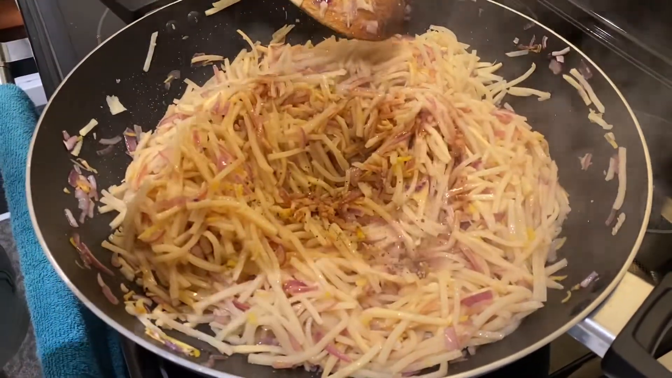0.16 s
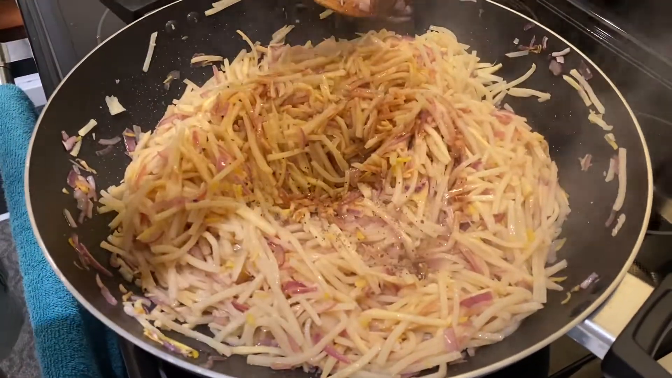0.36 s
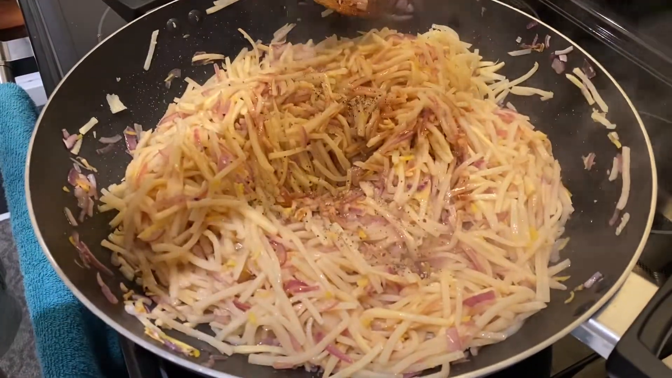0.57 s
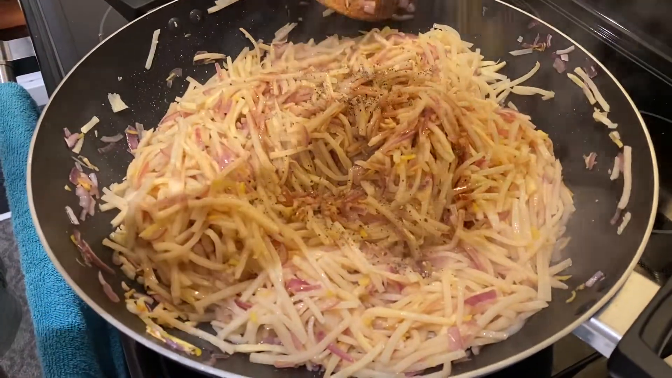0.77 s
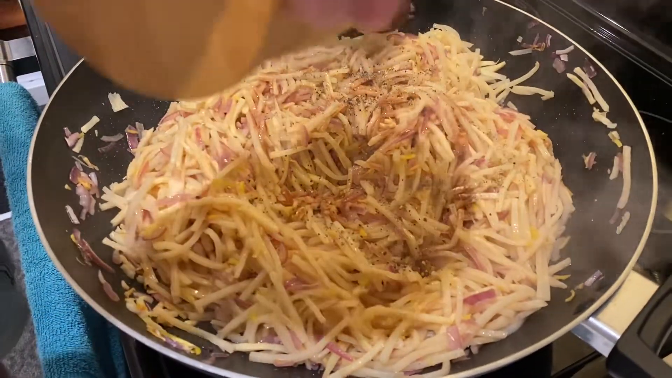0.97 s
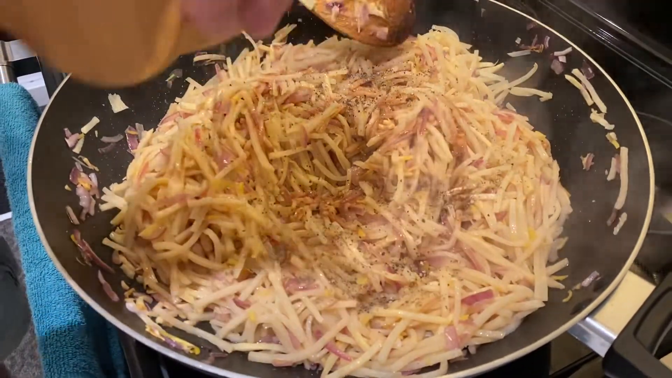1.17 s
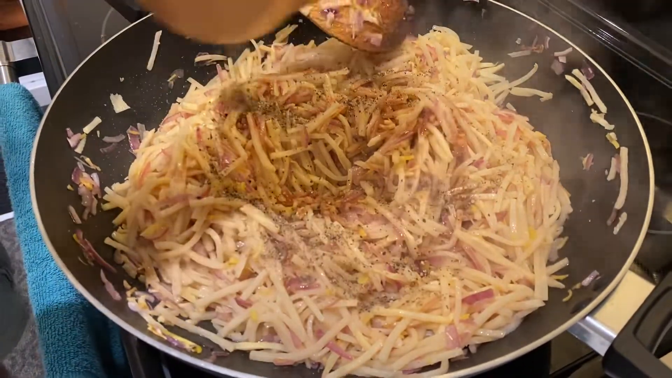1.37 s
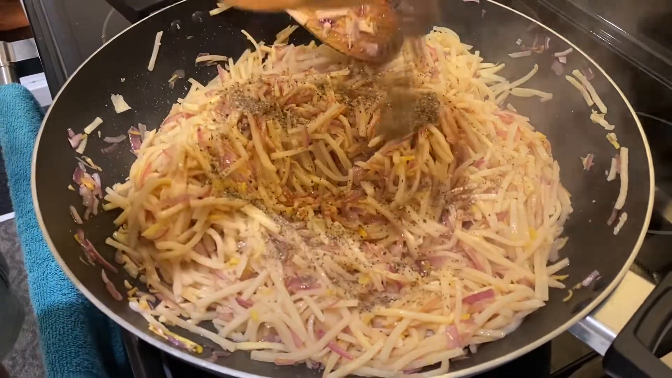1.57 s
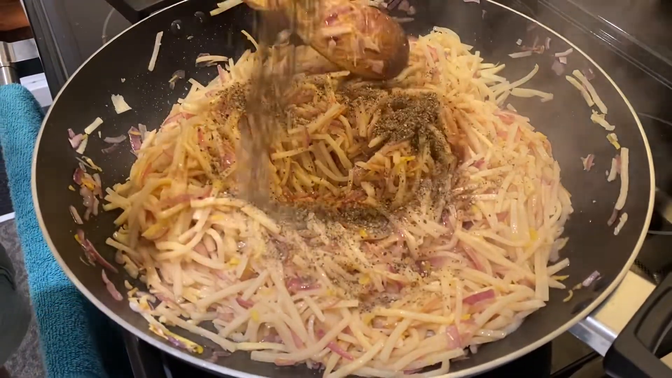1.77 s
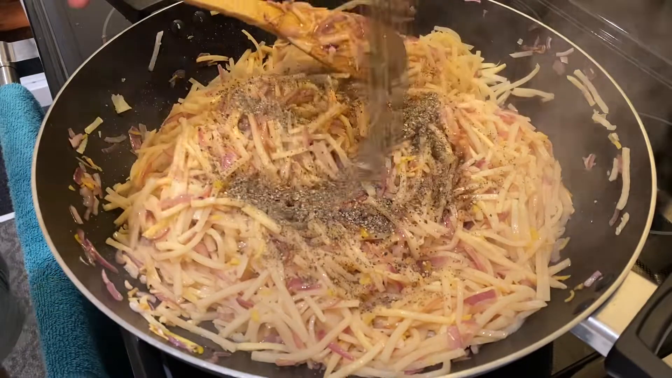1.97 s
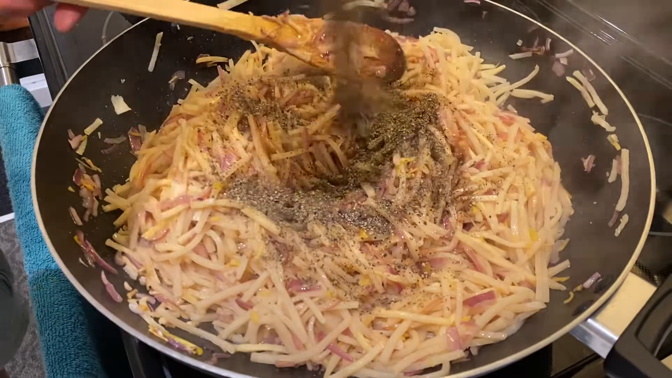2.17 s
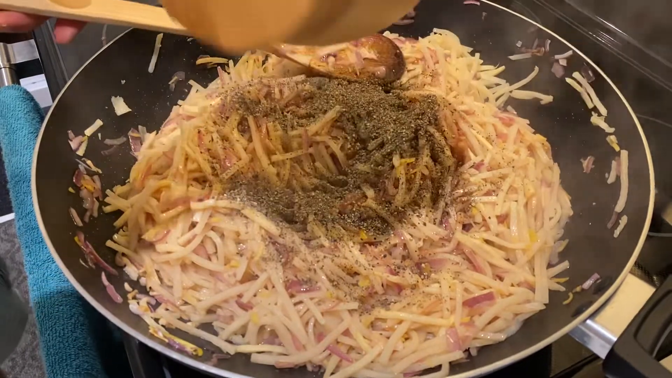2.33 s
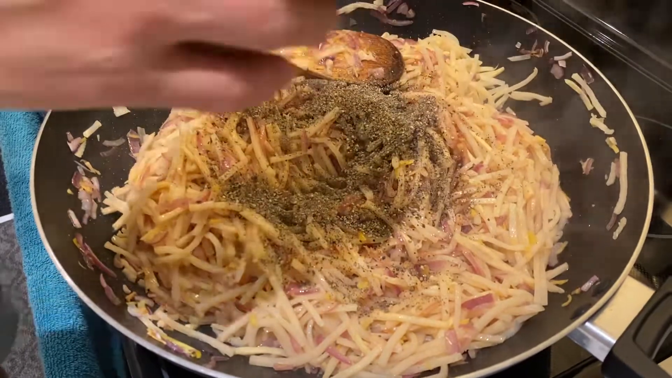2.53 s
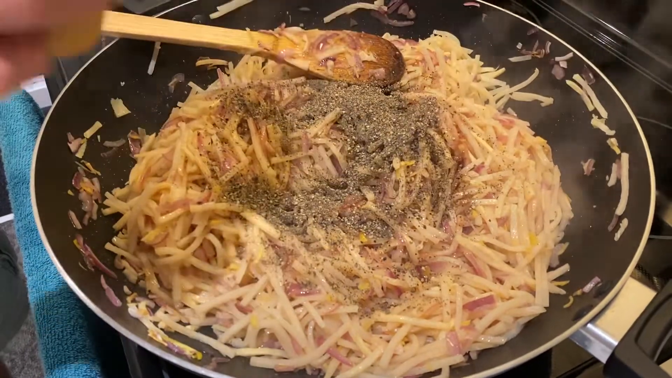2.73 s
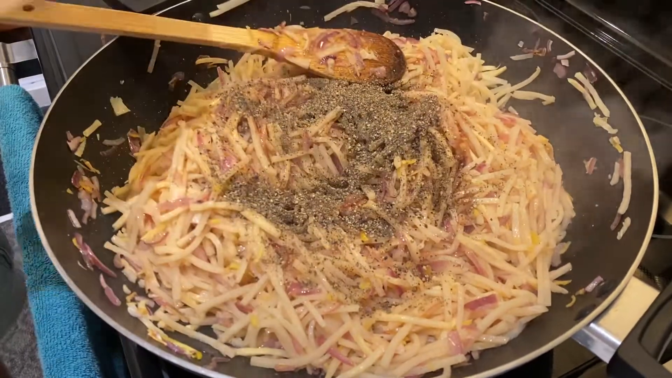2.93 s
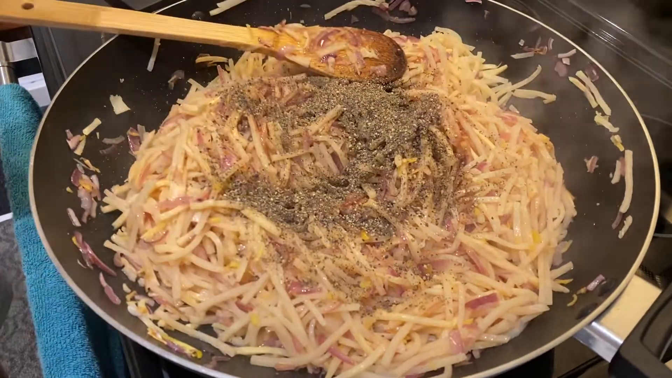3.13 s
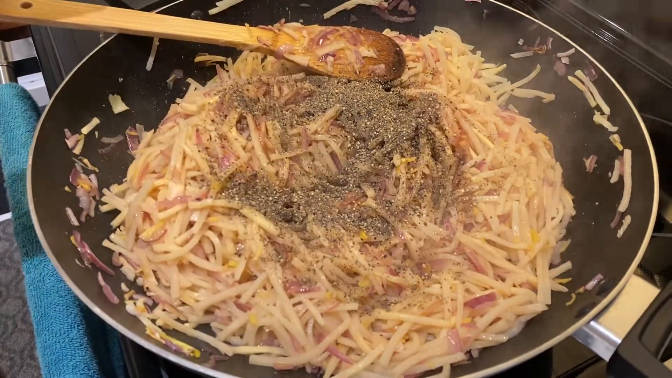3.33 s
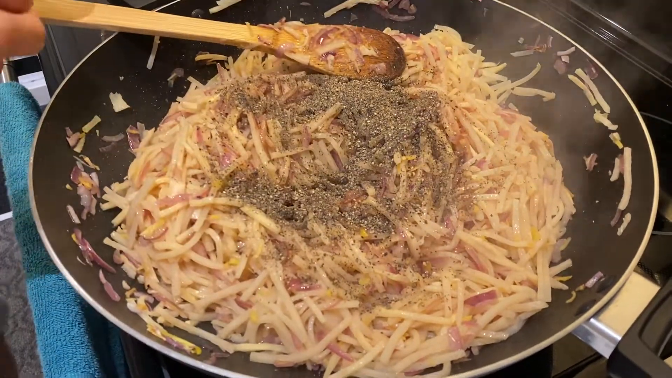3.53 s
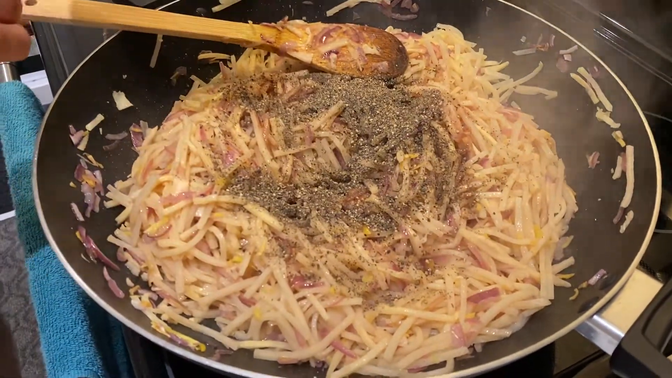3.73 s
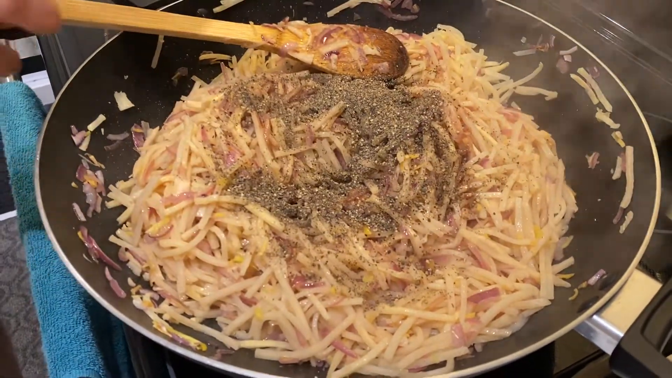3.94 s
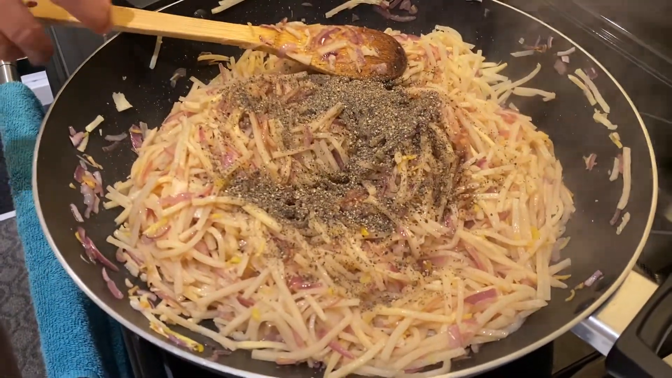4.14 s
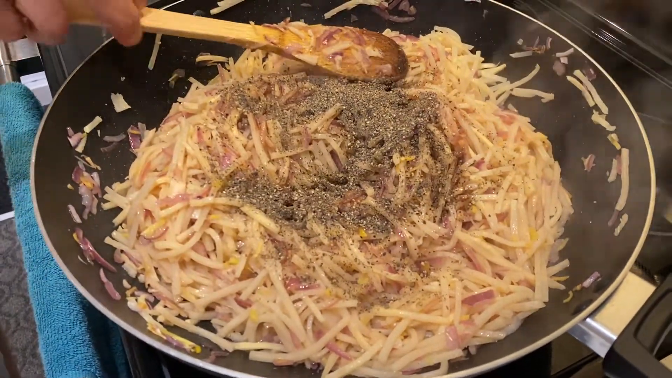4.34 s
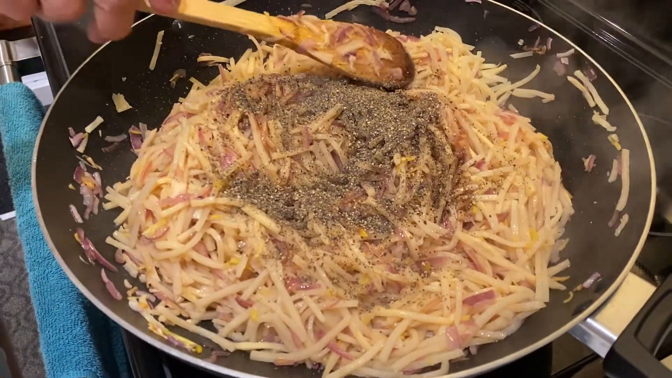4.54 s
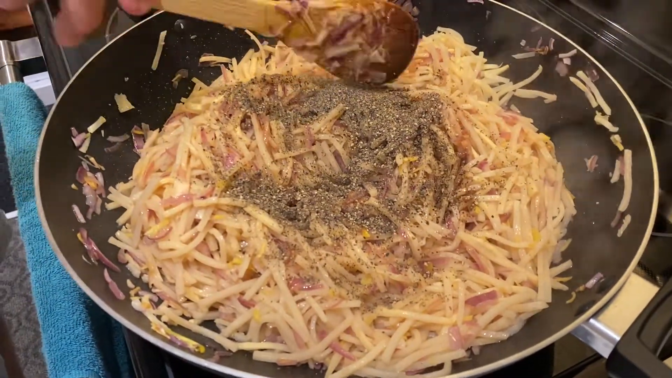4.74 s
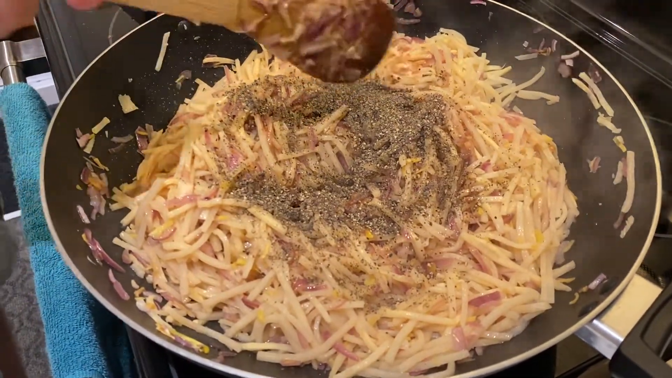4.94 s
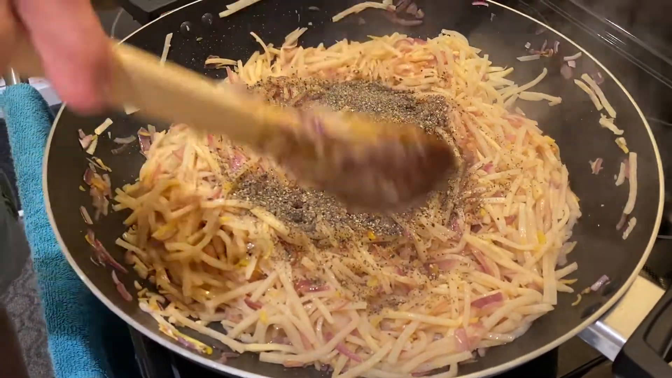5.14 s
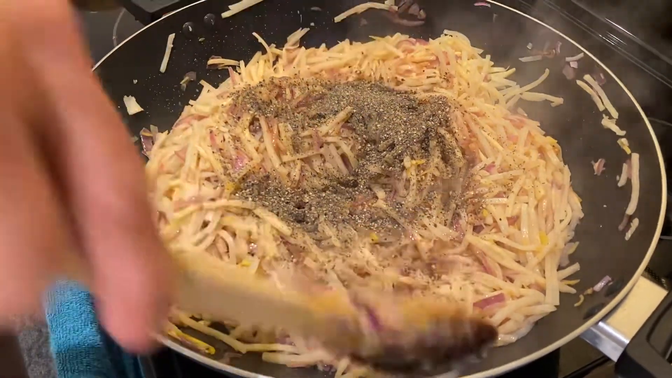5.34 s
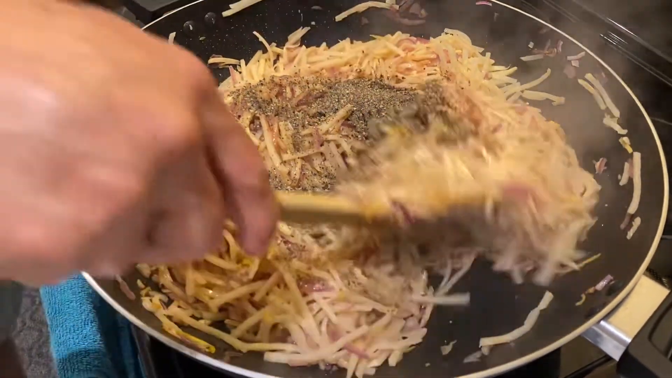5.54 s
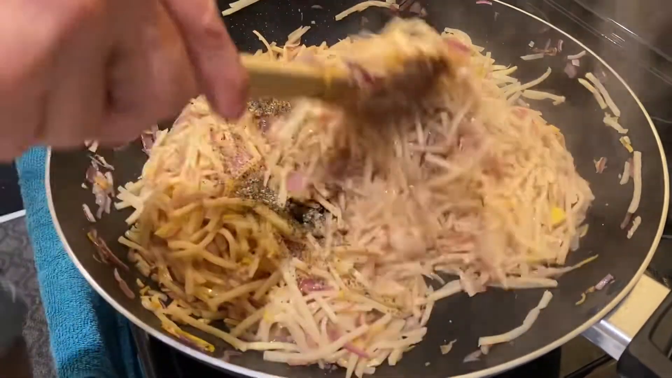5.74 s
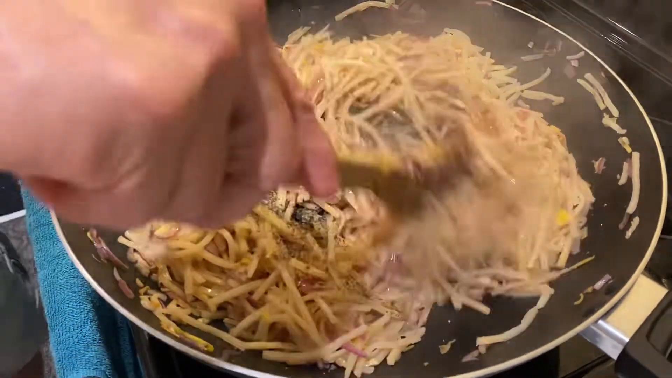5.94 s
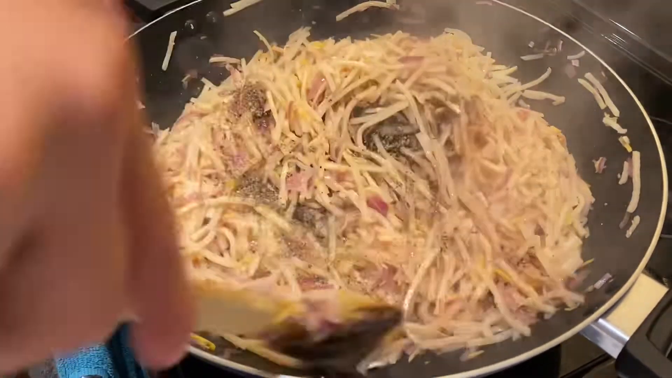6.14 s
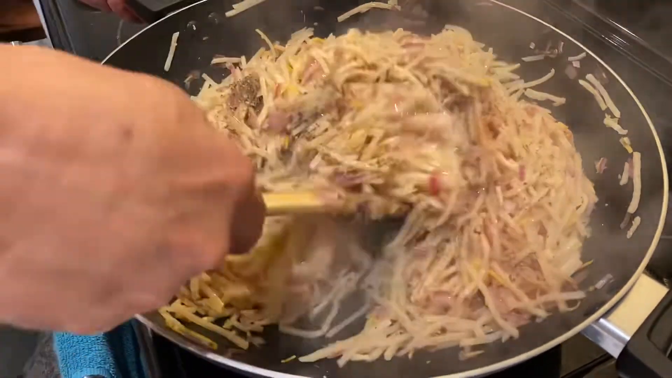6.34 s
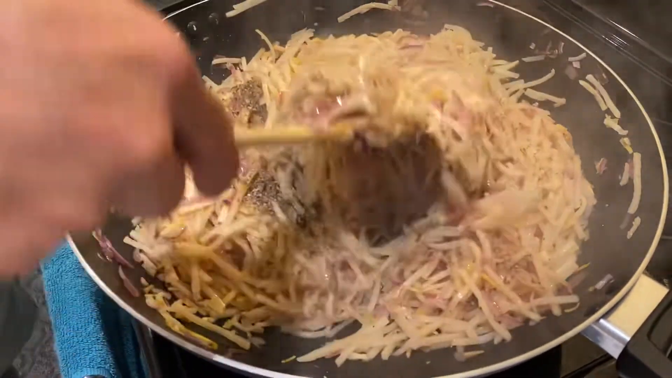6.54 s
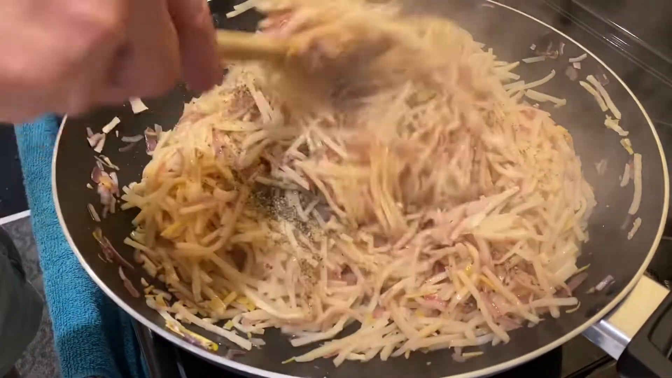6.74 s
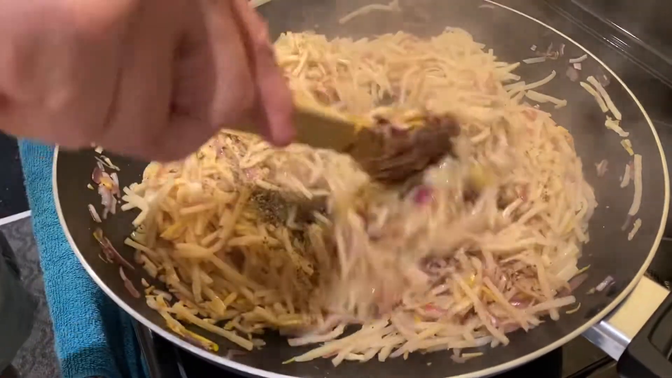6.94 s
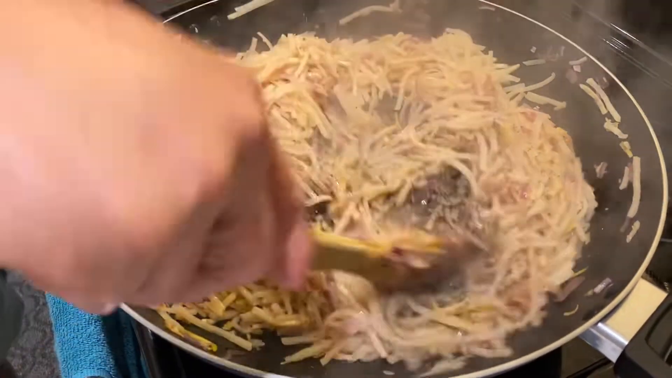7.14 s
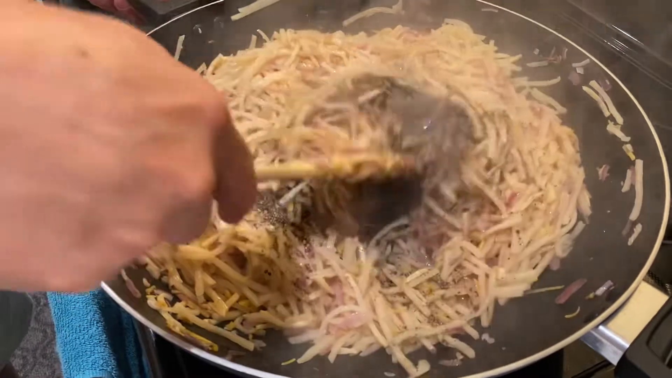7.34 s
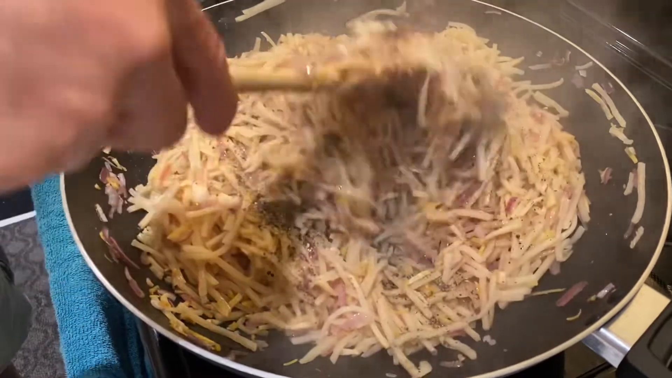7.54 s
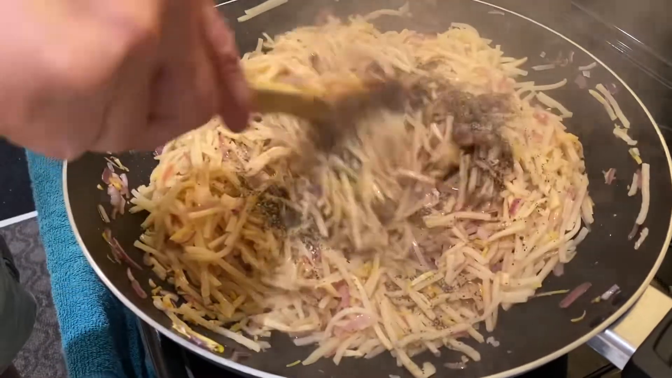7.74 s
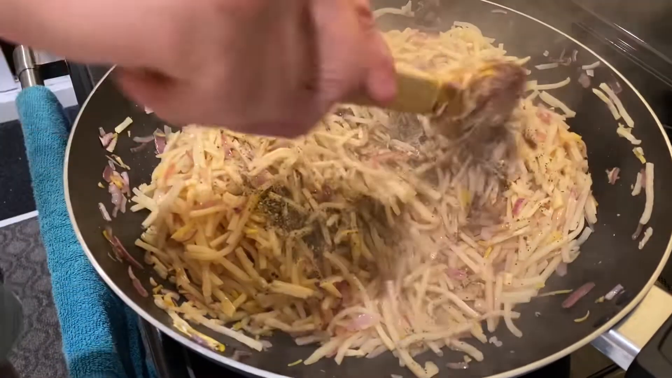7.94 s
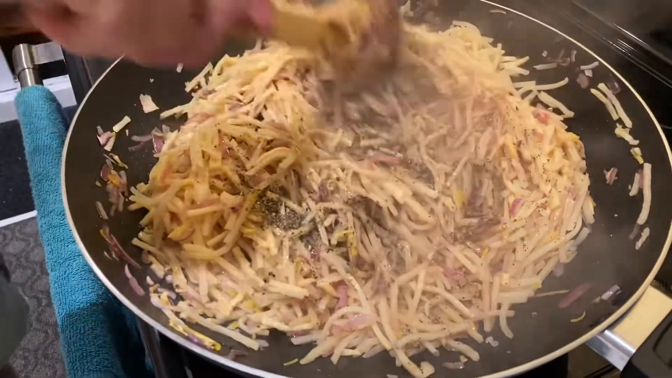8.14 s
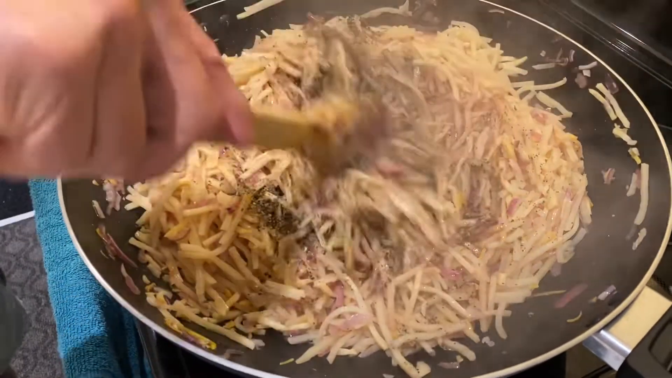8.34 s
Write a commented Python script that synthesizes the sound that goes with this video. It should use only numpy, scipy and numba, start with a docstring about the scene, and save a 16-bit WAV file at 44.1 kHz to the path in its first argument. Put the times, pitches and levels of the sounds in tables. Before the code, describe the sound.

Steady moist sizzling and a low, slightly wavering fan hum, heard close up in stereo in a small room with short reflections. Occasional crisp pops and faint air movement pass over it. A woody double clack on the pan announces the stirring: brief scrapes, soft thuds, denser snaps of oil, and hiss swelling with each turn of wet shreds, fading between strokes.

```python
"""A steady sizzle under a humming hood, with spits and plops, wooden knocks on a pan, then hissing surges of stirring.
Shredded vegetables fry close to a phone in a small kitchen: swarms of damped sines are the bursting steam bubbles,
shaped noise the escaping steam and rushing air, and unsteady sines the hum of the fan. Damped modes struck by short
pushes are the spoon on the pan. With every stroke wet shreds meet hot metal: the sizzle flares up, then fades."""
import sys
import numpy as np
from scipy import signal
from scipy.fft import rfft, irfft
from scipy.io import wavfile
from numba import njit

SR = 44100
rng = np.random.default_rng(int(sys.argv[2]) if len(sys.argv) > 2 else 0)


def digitize_waveform(pressure):
    """Quantize a signal to 16-bit integers and store it at the path in sys.argv[1].

    Rows of a 2-D input are taken as channels; values are limited to [-1, 1].
    """
    field = np.atleast_2d(pressure).T
    bounded = np.clip(field, -1, 1)
    quanta = np.round(bounded * 32767).astype(np.int16)
    wavfile.write(sys.argv[1], SR, quanta)


N = 374850
T = np.arange(N) / SR
FREQS = np.fft.rfftfreq(N, 1 / SR)

# spectrum of spattering oil, relative: frequency_hz, level_db
SPATTER_SPECTRUM = [(100, -60), (2000, -27), (4500, -1), (7000, -0.5), (12000, 4), (16000, 0)]
# strokes of the spoon through the heap, levels relative:
# start_s, rise_s, hold_s, hiss_db, hiss_fade_db_per_s, crackle_db
SPOON_STROKES = [(5.363, 0.074, 0.13, -37, 12, -35.5), (5.823, 0.036, .02, -40, 49, -42),
                 (6.15, 0.057, 0.057, -37.5, 26, -31.5), (6.218, 0.13, 0.32, -34.5, 19, -36),
                 (6.752, 0.046, .04, -41, 45, -34), (7.077, 0.076, 0.11, -37.5, 5.5, -44),
                 (7.194, 0.067, 0.049, -37, 12, -35), (7.698, 0.042, 0.06, -48, 8, -40.5),
                 (8.265, 0.063, .02, -43, 69, -38)]


def undb(db):
    """Logarithmic level: 20 dB is a factor of ten in amplitude."""
    return np.exp(np.asarray(db) * (np.log(10) / 20))


def level(x, db):
    """Root-mean-square scaling: bring the signal to the given rms level in dB."""
    return x * undb(db) / np.sqrt(np.mean(x ** 2))


def colour(x, points):
    """Linear filtering: weight the spectrum by (Hz, dB) points joined along log frequency."""
    hz, db = np.transpose(points)
    gain = undb(np.interp(np.log(FREQS + 1), np.log(hz), db))
    return irfft(rfft(x) * gain, N)


def walk(rate):
    """Low-passed noise: a smooth chance that changes about `rate` times a second, with rms 1."""
    smoothing = 1 + (FREQS / rate) ** 4
    return level(irfft(rfft(rng.standard_normal(N)) / smoothing, N), 0)


def flicker(rate):
    """Piecewise-linear modulation: random levels joined by straight lines, `rate` a second."""
    steps = int(T[-1] * rate) + 2
    return np.interp(T * rate, np.arange(steps), rng.standard_normal(steps))


def swells(table):
    """Amplitude envelopes: a bell for each (centre s, dB, length s), the length being its width at 1/e."""
    total = 0
    for centre_s, db, length_s in table:
        total = total + undb(db) * np.exp(-np.minimum((2 * (T - centre_s) / length_s) ** 2, 20))
    return total


def add(track, s, sound):
    """Superposition: mix a sound into a track at a time in seconds."""
    start = max(int(s * SR), 0)
    part = sound[:max(N - start, 0)]
    track[start:start + len(part)] += part


def kitchen(x, wet_db, left_db):
    """Room reverberation: direct sound, slightly from the left, and the quick echoes of hob, wall and hood."""
    t60_s = 0.33
    t = T[:SR // 3]
    # a strong, brief burst of early echoes on top of the exponential decay
    fade = undb(-60 * t / t60_s) + 7.3 * np.exp(-t / 0.0068)
    echoes = rng.standard_normal((2, len(t))) * fade * (t > 1 / 1000)
    echoes /= np.sqrt(np.sum(echoes ** 2, axis=1, keepdims=True))
    # the right ear hears the direct sound one sample later
    direct = np.array([undb(left_db) * x, np.roll(x, 1)])
    return direct + undb(wet_db) * signal.oaconvolve(x[None], echoes, axes=1)[:, :N]


def hood():
    """Blade tones and flow noise: the fan hums unsteadily over rushing air whose deep bass is alike in both ears."""
    # tones of the fan, levels relative: pitch_hz, level_db, unsteadiness_db
    fan_tones = [(141.3, -39.5, 0.74), (283.2, -46, 3), (118.9, -50.5, 3)]
    # spectrum of the rushing air, relative: frequency_hz, level_db
    air_spectrum = [(20, -36), (35, -18), (55, -5), (90, 0.5), (125, 1), (160, -5.5), (195, 1), (225, -3),
                    (285, 2), (345, -8.5), (390, -14), (460, -8.5), (620, -12), (820, -8), (1500, -27)]
    hum = 0
    for hz, db, shake_db in fan_tones:
        loudness = np.sqrt(2) * undb(db + shake_db * walk(1.7))
        # the phase wanders too, more so for higher tones
        hum = hum + loudness * np.sin(2 * np.pi * hz * T + hz / 300 * walk(1.43))
    air = level(colour(rng.standard_normal(N), air_spectrum), -38.0)
    side = level(colour(rng.standard_normal(N), air_spectrum), -38.0)
    side = colour(side, [(60, -41), (130, -6.0), (280, -13), (500, 1.5), (900, -5.0)])
    return np.array([undb(-1.27) * (hum + air + side), undb(0.16) * (hum + air - side)])


@njit
def bursts(times, hz, cycles, size):
    """Damped oscillation: each bursting bubble is a sine that dies by 60 dB within a few cycles."""
    out = np.zeros(N)
    for k in range(len(times)):
        start = int(times[k] * SR)
        length = cycles[k] * SR / hz[k]
        # a spiralling phasor: its imaginary part is the damped sine
        phasor = size[k] + 0j
        turn = np.exp(2j * np.pi * hz[k] / SR - np.log(1000) / length)
        for i in range(max(start, 0), min(start + int(length) + 1, N)):
            phasor *= turn
            out[i] += phasor.imag
    return out


def fizz(rate, spread_db, cycles):
    """Random superposition: bursts of all pitches; a positive spread makes most tiny and a few large."""
    count = int(rate * N / SR)
    when, pitch, damping, rank = rng.random((count, 4)).T
    hz = 300 * (SR * .45 / 300) ** np.sqrt(pitch)
    size = undb(-spread_db * np.log(np.maximum(rank, 25 / rate)))
    # small, high bubbles are the most common and snap the hardest
    snap = size * hz / (pitch + 1 / 20) ** (1 / 4)
    # `cycles` is the average beyond the first cycle
    return level(bursts(when * N / SR, hz, 1 + cycles * 2 * damping, snap), 0)


def swarm(rate, spread_db, cycles, wet_db, left_db, count=3):
    """Incoherent sources: bubbles burst in several independent groups, each with its own echoes."""
    groups = [kitchen(fizz(rate / count, spread_db, cycles), wet_db, left_db) for _ in range(count)]
    return sum(groups) / np.sqrt(count)


def steam():
    """Turbulent jet noise: smooth hiss, unrelated in the two ears and a little stronger on the left."""
    return rng.standard_normal((2, N)) * undb([[1], [-1]])


def patchy(x, db, rate):
    """Band-wise modulation: patches of the pan flare up, so each third of an octave flickers in level."""
    spectrum = rfft(x)
    # position in thirds of an octave; all below 500 Hz moves together
    place = 3 * np.log2(np.maximum(FREQS, 500) / 500)
    out = 0
    for k in range(16):
        band = np.maximum(1 - np.abs(place - k), 0)
        out = out + irfft(spectrum * band, N) * undb(db * flicker(rate))
    return out


def simmer():
    """Boiling noise: the resting heap's dense bursts and escaping steam, with sparse ticks of spattering oil."""
    # spectrum of the resting sizzle, relative: frequency_hz, level_db
    sizzle_spectrum = [(30, -56), (250, -2.5), (500, -6.5), (900, -3), (1350, 1.2), (2200, -0.95),
                       (3200, -0.5), (4200, -2), (5200, -4), (6200, -7.5), (8000, -9.5), (11000, -14),
                       (14000, -17), (16000, -55)]
    bubbles = swarm(rate=6500, spread_db=0.83, cycles=5.1, wet_db=-2.0, left_db=3.0)
    sizzle = colour(bubbles + undb(-2.5) * steam(), sizzle_spectrum)
    ticks = level(colour(fizz(rate=370, spread_db=7, cycles=1), SPATTER_SPECTRUM), -65)
    return level(patchy(sizzle, db=0.9, rate=25), -35.5) + ticks


def snaps(table):
    """Impulse response of a resonator: a sudden jump of pressure; the narrower its band, the longer it rings."""
    out = np.zeros(N)
    kick = 1. * (T[:SR // 100] == 0)
    for s, db, hz, width_hz in table:
        b, a = signal.iirpeak(hz, hz / min(width_hz, SR / 3), fs=SR)
        snap = signal.lfilter(b, a, signal.lfilter(b, a, kick))
        add(out, s, undb(db) * snap / np.abs(snap).max())
    return out


def pops(table, cycles):
    """Enveloped tone: a soft, lone burst swells for the given number of cycles and dies within a few more."""
    out = np.zeros(N)
    t = T[:SR // 30]
    for s, db, hz in table:
        age = t * hz / cycles
        swell = (age * np.exp(1 - age)) ** 2
        # the tone begins 0.73 ms after the listed time
        add(out, s + 0.00073, undb(db) * swell * np.sin(2 * np.pi * hz * t))
    return out


def small_pops(rate, db, spread_db, hz, octaves):
    """Uniform random events: rows (s, dB, Hz) of weaker pops, stronger once the stirring starts."""
    stirred_gain_db = 9.5
    when, size, pitch = rng.random((int(rate * T[-1]), 3)).T
    s = when * T[-1]
    pop_db = db + spread_db * (2 * size - 1) + stirred_gain_db * (s > SPOON_STROKES[0][0])
    return list(zip(s, pop_db, hz * 2 ** (octaves * (2 * pitch - 1))))


def popping():
    """Transient radiation: fat spits sharply and steam pockets plop, a few loud ones among many weak ones."""
    # loudest spits of fat, levels relative; the width is that of each of two equal resonances:
    # time_s, level_db, pitch_hz, width_hz
    loud_spits = [(0.6965, -24, 3400, 3000), (0.7667, -17.5, 3600, 2800), (1.1955, -25, 3700, 2500),
                  (1.4438, -16, 3600, 1500), (2.0403, -20, 2990, 2500), (2.0697, -24, 2150, 1500),
                  (2.3536, -27, 1900, 1300), (2.985, -11.5, 3670, 5500), (3.0985, -28, 3500, 3000),
                  (4.340, -13.5, 3100, 2800), (4.8475, -16, 2700, 2200), (4.967, -22, 2460, 2500),
                  (5.4284, -7, 11400, 7000), (5.4465, -15.5, 3330, 3000), (5.6345, -11, 3600, 2500),
                  (5.679, -1, 7500, 6000), (5.688, -9, 10500, 6000), (5.8755, -5, 11000, 7000),
                  (6.052, -5.5, 11000, 8000), (6.113, -12, 4600, 3000), (6.4567, -16, 3590, 2500),
                  (6.699, -13, 3400, 2000), (6.757, -17, 3500, 2500), (6.8115, -7, 9000, 10000),
                  (6.8282, -6.5, 4200, 3600), (6.852, -13, 4800, 3000), (7.003, -18, 3240, 3000),
                  (7.047, -13, 2960, 3000), (7.382, -20, 4000, 3500), (7.395, -10, 3380, 2500),
                  (7.846, -14, 3500, 2500), (7.912, -10, 5180, 3500), (7.9965, -11, 3800, 2400),
                  (8.0845, -8, 5200, 6000), (8.349, -6, 11000, 7000)]
    # loudest steam pockets plopping under the heap, levels relative: time_s, level_db, pitch_hz
    loud_plops = [(0.221, -31, 840), (1.624, -24, 1140), (2.205, -32, 918), (5.087, -27, 880),
                  (7.395, -32, 611)]
    weak_spits = small_pops(rate=7, db=-30.0, spread_db=4, hz=3100, octaves=0.44)
    # a weak spit is 2200 Hz wide, so it barely rings
    spits = list(loud_spits) + [(*row, 2200) for row in weak_spits]
    plops = list(loud_plops) + small_pops(rate=1.1, db=-37.5, spread_db=5, hz=1510, octaves=0.41)
    return snaps(spits) + pops(plops, cycles=1.4)


def draughts():
    """Low-frequency wind noise: air brushes the microphone as the hands move over the pan."""
    # soft swells of moving air: centre_s, level_db, length_s
    air_swells = [(1.0, -39.5, 0.3), (1.42, -40, 0.13), (2.34, -38, 0.11), (2.5, -40, 0.13),
                  (7.18, -41, 0.2)]
    rumble = colour(rng.standard_normal(N), [(20, -37), (50, -9), (85, -4), (140, -8), (500, -68)])
    return swells(air_swells) * level(rumble, 0)


def ring(modes):
    """Modal synthesis: damped sines with joint peak 1; neighbouring modes start in opposite directions."""
    t = T[:SR // 3]
    y = 0
    for k, (hz, db, t60_s) in enumerate(modes):
        decay = np.exp(-np.log(1000) * t / t60_s)
        y = y + (-1) ** k * undb(db) * np.sin(2 * np.pi * hz * t) * decay
    return y / np.abs(y).max()


def spoon():
    """Impact excitation: wood strikes the pan and rebounds, duller for longer contact; the pan rocks on the hob."""
    # bare spoon knocking and bouncing on the pan, levels relative, the clack decaying to 1/e:
    # time_s, level_db, contact_ms, pan_ring_db, clack_decay_s
    knock_events = [(4.8662, 0.9, 0.41, -1.1, 0.014), (4.8833, -5.3, 0.5, 0.5, 0.017),
                    (4.8892, -7, 0.4, 1.5, 0.027), (4.908, -15.5, 0.28, 0, 0.046),
                    (4.929, -20, 0.31, -1, 0.04)]
    # the pan rocking on its grate, levels relative: time_s, level_db
    rock_events = [(4.8753, -16.5), (4.903, -16.5)]
    # ring of spoon and pan, levels relative: frequency_hz, level_db, t60_s
    pan_modes = [(497, -21, 0.16), (840, -0.5, 0.021), (983, 1.5, 0.024), (1140, -26, 0.12),
                 (1280, -12, 0.091), (1502, -18.5, 0.058), (1835, -11, 0.032), (2030, -28, .1),
                 (2300, -26, 0.08), (2500, -19, 0.06), (2700, -16, 0.07), (2960, -22, 0.019),
                 (3300, -15, 0.06), (4240, -4, .1)]
    # ring of the grate and hob, levels relative: frequency_hz, level_db, t60_s
    hob_modes = [(78, -7, 0.074), (125, 4, 0.16), (247, -2.5, 0.063), (351, -9, 0.14)]
    rebound_s, rebound_db = 0.00339, -6.5  # the spoon touches again after each knock
    clack_db = -8.5  # dense, dry ring of the wood
    strike_spot_db = 1.7  # each blow lands elsewhere and favours other modes
    out, hob = np.zeros(N), ring(hob_modes)
    t = T[:len(hob)]
    wood = signal.butter(2, (380, 2300), "band", fs=SR, output="sos")
    for s, db, contact_ms, ring_db, clack_s in knock_events:
        pan = ring([(hz, mode_db + strike_spot_db * rng.standard_normal(), t60_s)
                    for hz, mode_db, t60_s in pan_modes])
        # contact force: half a sine
        push = np.sin(np.pi * np.minimum(t[:SR // 100] * 1000 / contact_ms, 1))
        for delay_s, loss_db in [(0, 0), (rebound_s, rebound_db)]:
            clack = signal.sosfilt(wood, rng.standard_normal(len(t))) * np.exp(-t / clack_s)
            blow = undb(ring_db) * pan + undb(clack_db) * clack
            knock = signal.fftconvolve(blow, push / push.sum())
            add(out, s + delay_s, undb(db + loss_db) * knock)
    for s, db in rock_events:
        add(out, s, undb(db) * hob)
    return signal.sosfilt(signal.butter(2, 55, "high", fs=SR, output="sos"), out)


def scraping():
    """Stick-slip friction: the dragged spoon slips in fits; each drag has its own pitch, lower where food dulls it."""
    # drags over the bottom of the pan, levels relative: centre_s, level_db, length_s, pitch_hz
    drags = [(4.895, -33.5, 0.04, 1850), (5.445, -38, 0.11, 1700), (6.17, -43, .03, 950),
             (6.213, -36, .04, 2200), (6.303, -32, .028, 2700), (6.32, -34.5, 0.08, 1150),
             (6.685, -36, 0.081, 1900), (6.832, -35, .035, 3300), (6.875, -35, 0.036, 1500),
             (6.92, -42, .05, 1150), (6.985, -44, 0.045, 1300), (7.045, -34, .04, 1700),
             (7.218, -35, 0.05, 1300), (7.3, -40, 0.076, 1500), (7.39, -37, 0.03, 3000),
             (7.78, -36, .035, 1400), (7.855, -36, 0.045, 1500), (8.282, -34, 0.036, 1460),
             (8.367, -33, 0.032, 2900)]
    # spectrum of the dragged spoon, relative: multiple_of_pitch, level_db
    drag_spectrum = [(.15, -30), (.45, -11), (.8, -5), (1.2, 0.5), (1.9, -8), (4, -30)]
    slips_per_s = 900
    slips = (rng.random(N) < slips_per_s / SR) * rng.standard_normal(N)
    # the spoon catches on the shreds and jerks free
    slips = slips * undb(1 * flicker(110))
    multiple, gain_db = np.transpose(drag_spectrum)
    spectrum, log_hz = rfft(slips), np.log(FREQS + 1)
    out = 0
    for centre_s, db, length_s, hz in drags:
        gain = undb(np.interp(log_hz, np.log(hz * multiple), gain_db))
        drag = level(irfft(spectrum * gain, N), 0)
        out = out + drag * swells([(centre_s, db, length_s)])
    return out


def stroke(s, rise_s, hold_s, db, fade_db_per_s):
    """Exponential decay: gain rises as the spoon pushes, holds, then fades as the water boils off."""
    fade_time = np.maximum(T - s - rise_s - hold_s, 0)
    return np.clip((T - s) / rise_s, 0, 1) * undb(db - fade_db_per_s * fade_time)


def agitation():
    """Power summation: gains of hiss and crackle, in which overlapping strokes add in power."""
    # the hiss surges as a clump lands on hot metal, or sinks as it is covered: centre_s, change_db, length_s
    hiss_surges = [(5.68, 2.5, 0.043), (5.793, 1, .08), (6.295, 1.5, .05), (6.89, 2, .05),
                   (7.278, 0.5, 0.082), (8.5, -5, .08)]
    crackle_fade_db_per_s = 6  # the turned heap settles slowly
    hiss_power, crackle_power, surge_db = 0, 0, 0
    for s, rise_s, hold_s, hiss_db, fade, crackle_db in SPOON_STROKES:
        hiss_power = hiss_power + stroke(s, rise_s, hold_s, hiss_db, fade) ** 2
        crackle_power = crackle_power + stroke(s, rise_s, hold_s, crackle_db, crackle_fade_db_per_s) ** 2
    for centre_s, change_db, length_s in hiss_surges:
        surge_db = surge_db + change_db * swells([(centre_s, 0, length_s)])
    return np.sqrt(hiss_power) * undb(surge_db), np.sqrt(crackle_power)


def stirring():
    """Flash boiling: wet shreds hiss on bare metal and throw up oil, while the moved heap crackles lower down."""
    # spectra of searing, moved heap and finest fizz, relative: frequency_hz, level_db
    sear_spectrum = [(30, -70), (800, -30), (2000, -19.5), (3500, -0.5), (5000, 1.5), (6100, -1),
                     (7200, 4.5), (9000, 0), (11000, 3.5), (13500, -10), (16000, -13)]
    heap_spectrum = [(30, -60), (300, -16), (600, -8.5), (1200, -2), (2000, 1.5), (3500, 4.5), (5000, 0.5),
                     (8000, -5.5), (16000, -47)]
    mist_spectrum = [(3000, -60), (6000, -27), (8500, -16), (11000, 0.5), (13500, 3), (15800, 0),
                     (17000, -30)]
    hiss, crackle = agitation()
    sear = swarm(rate=14000, spread_db=2.5, cycles=2.9, wet_db=-3.5, left_db=0.5) + undb(-6.5) * steam()
    heap = swarm(rate=4200, spread_db=1.5, cycles=3.2, wet_db=-6.0, left_db=1) + undb(-19.0) * steam()
    ticks = level(colour(fizz(rate=900, spread_db=3.5, cycles=0.72), SPATTER_SPECTRUM), 1.7)
    mist = level(colour(fizz(rate=10000, spread_db=-1.0, cycles=1.9), mist_spectrum), 6)
    # the finest fizz comes only with the hardest searing: an extra power of the hiss gain
    mist = mist * (hiss / hiss.max()) ** 0.95
    sear = level(colour(sear, sear_spectrum), 7.03) + ticks + mist
    sear = sear * hiss * undb(0.42 * walk(27))
    heap = level(colour(heap, heap_spectrum), 0.59) * crackle * undb(0.6 * walk(13))
    return patchy(sear + heap, db=1.4, rate=22)


def thuds():
    """Heavily damped impact: the spoon butts through the heap, deadened by the food."""
    # soft blows, levels relative: time_s, level_db, pitch_hz
    soft_blows = [(5.421, -27, 430), (6.467, -29, 600), (6.7395, -20, 800), (6.746, -20, 1200),
                  (7.138, -30, 550), (8.087, -25, 1300)]
    return pops(soft_blows, cycles=0.67)


def scene():
    """Linear superposition of pan, spoon and hood in one room."""
    bed = hood() + simmer() + draughts() + stirring()
    knocks = kitchen(spoon(), wet_db=-10.5, left_db=1.8)
    details = kitchen(popping() + scraping() + thuds(), wet_db=-11, left_db=.8)
    return bed + knocks + details


def record(dry):
    """Interchannel phase: the phone widens its treble, one signal on both sides, turned in phase band by band."""
    left, right = rfft(dry)
    # above about 6 kHz both sides carry the left treble
    shared = np.clip((FREQS - 5900) / 500, 0, 1)
    treble = left * undb(-0.2)
    # from 7400 Hz up, every 2070 Hz adds half a turn, with a pause at a quarter turn
    band, place = np.divmod(np.maximum(FREQS - 7400, 0), 2070)
    turn = np.pi * (band + np.interp(place, [0, 250, 850, 1100], [0, .5, .5, 1]))
    left = (1 - shared) * left + shared * treble * np.exp(-1j * turn) * undb(.3)
    right = (1 - shared) * right + shared * treble
    # nothing much is left above 15750 Hz
    low_pass = signal.ellip(10, .2, 70, 15750, fs=SR, output="sos")
    return signal.sosfilt(low_pass, irfft(np.array([left, right]), N))


dry = scene()
out = record(dry)
digitize_waveform(out)
```